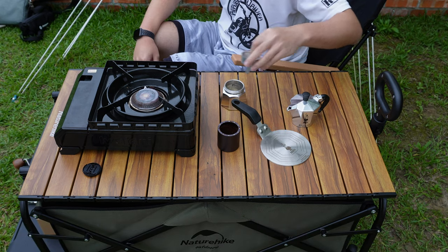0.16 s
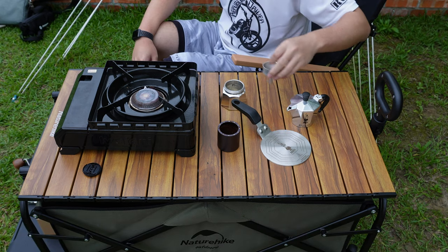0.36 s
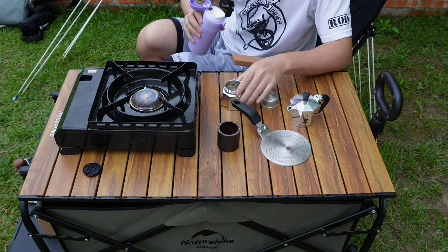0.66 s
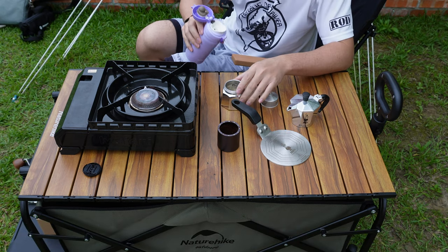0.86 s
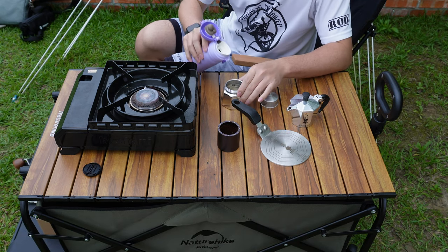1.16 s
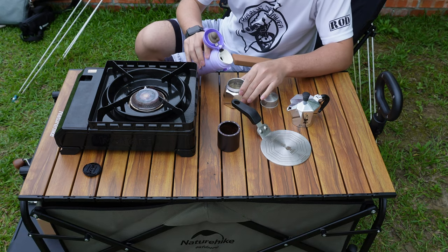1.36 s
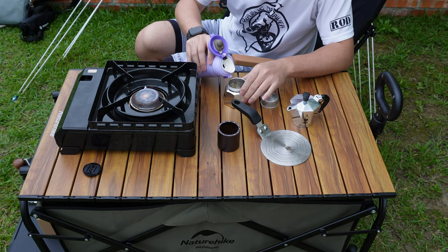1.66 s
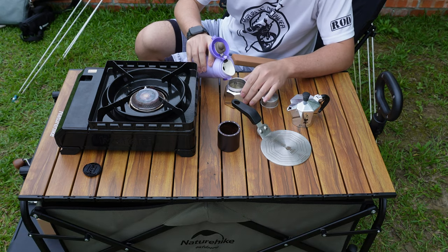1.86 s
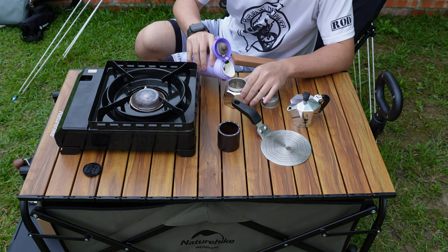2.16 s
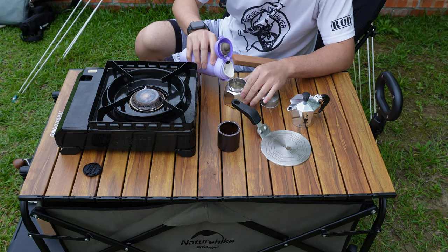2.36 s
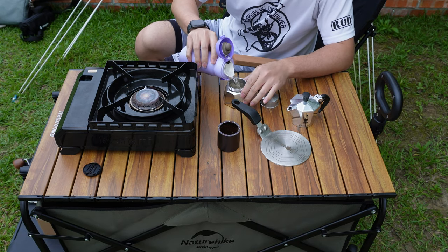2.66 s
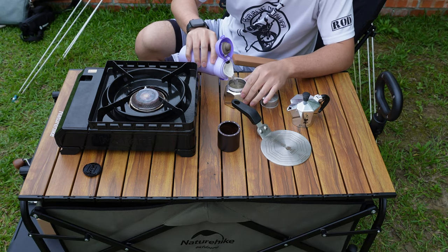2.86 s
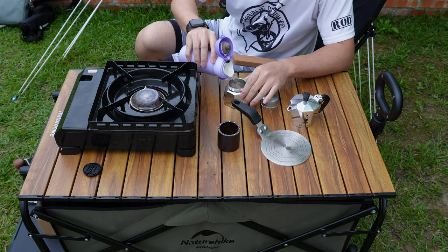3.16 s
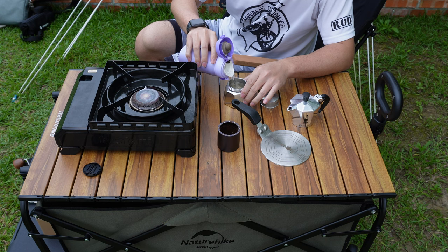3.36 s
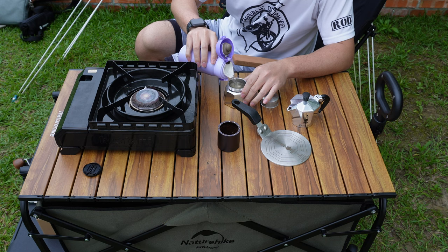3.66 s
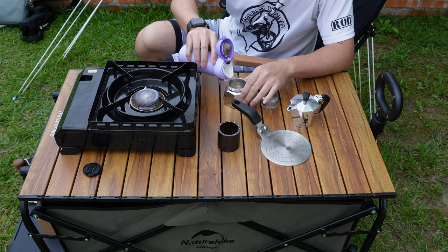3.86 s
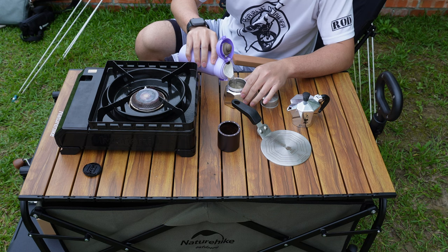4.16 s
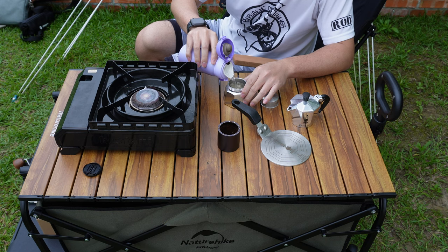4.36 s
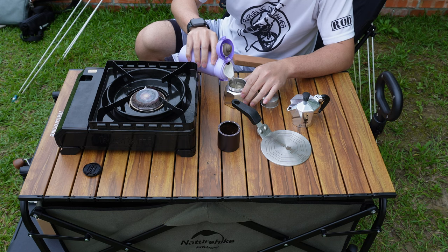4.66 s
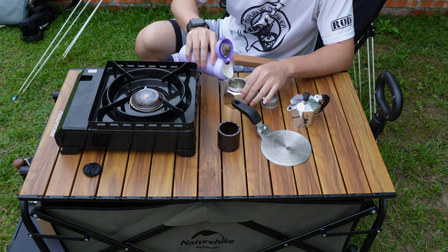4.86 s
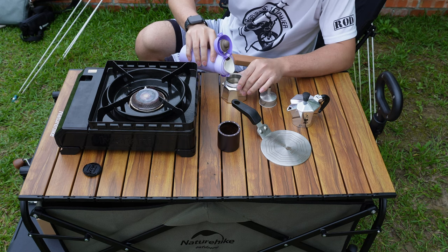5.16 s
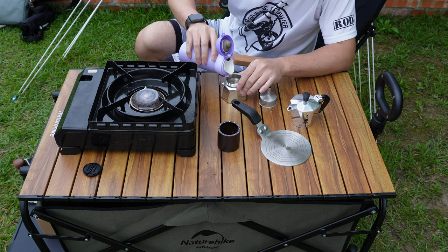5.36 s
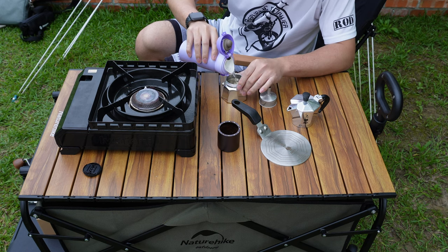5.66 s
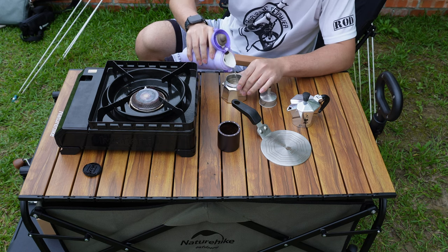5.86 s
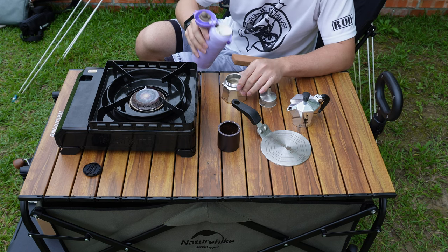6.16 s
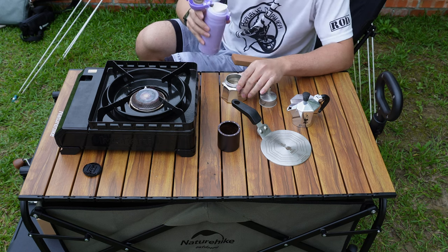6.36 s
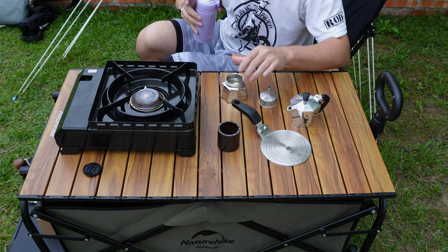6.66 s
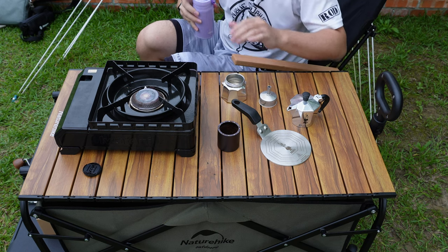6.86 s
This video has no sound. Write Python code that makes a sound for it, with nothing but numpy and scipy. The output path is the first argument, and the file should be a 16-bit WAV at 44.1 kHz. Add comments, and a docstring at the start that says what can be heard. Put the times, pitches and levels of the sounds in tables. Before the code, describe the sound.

Outdoors on a lawn, cicadas pulse and buzz steadily above a faint distant rumble. A small metal funnel chimes, then knocks and scrapes across wooden slats with a brief squeak. Clothing rustles, and a cat meows once to the left. A plastic cup then rattles and taps on the hand-held funnel as coffee grounds rasp and patter in. Small rubs and ticks follow. Close stereo microphones, little echo.

```python
"""Coffee is made at a slatted camping table on a lawn; cicadas and a faint, distant rumble last throughout.
First a metal pot funnel chimes, is knocked and shoved over the slats: dense slips and blows ring its modes.
Clothes rustle as grainy friction noise, and a cat meows once nearby: overtones shaped by three resonances.
Then a plastic grinder cup taps, rattles and squeaks against the held funnel as damped or gliding tones,
while the grounds shaken in rasp through moving resonances and patter; a few rubs, hisses and ticks follow."""
import sys
import numpy as np
from scipy import signal
from scipy.fft import rfft, irfft, next_fast_len
from scipy.io import wavfile
from scipy.ndimage import uniform_filter1d

SR = 44100
rng = np.random.default_rng(int(sys.argv[2]) if len(sys.argv) > 2 else 0)


def waveform_to_disk(signal):
    """Save audio, clipped to [-1, 1], as 16-bit WAV at the path in sys.argv[1]."""
    frames = np.transpose(np.atleast_2d(signal))
    scaled = np.clip(frames, -1, 1) * 32767
    samples = np.round(scaled).astype(np.int16)
    wavfile.write(sys.argv[1], SR, samples)


N = 309134
T = np.arange(N) / SR  # time of every sample, s


def from_db(db):
    """Level definition: an amplitude ratio is 10 to the power of dB / 20."""
    return 10 ** (np.asarray(db) / 20)


def rms_one(x):
    """Power normalisation: the root mean square becomes 1."""
    return x / np.sqrt(np.mean(x ** 2) + 1e-20)


def curve(rows, column):
    """Linear interpolation: one column of a table at every sample."""
    rows = np.array(rows)
    return np.interp(T, rows[:, 0], rows[:, column])


def swell(rows, column):
    """Amplitude envelope: gain of a level column, with short smooth edges and silence outside its span."""
    inside = (T >= rows[0][0]) & (T <= rows[-1][0])
    return from_db(curve(rows, column)) * uniform_filter1d(inside * 1., size=400)


def drift(rate):
    """Band-limited chance: random knots, 2 * rate per second, joined by lines; spread about 1."""
    knots = rng.standard_normal(4000)
    return np.sqrt(3 / 2) * np.interp(T * 2 * rate, np.arange(len(knots)), knots)


def colour(x, points):
    """Spectral shaping: levels joined over log frequency, steep falls beyond the ends; rms 1."""
    size = next_fast_len(N)
    hz, db = np.transpose(points)
    octave = np.log2(np.arange(size // 2 + 1) * SR / size + 1)
    beyond = np.abs(octave - np.clip(octave, np.log2(hz[0]), np.log2(hz[-1])))
    gain = from_db(np.interp(octave, np.log2(hz), db) - 22.4 * beyond)
    return rms_one(irfft(rfft(x, size) * gain, size)[..., :N])


def place(x, pan_db):
    """Interaural level difference: positive is left."""
    return x * from_db([[pan_db / 2], [-pan_db / 2]])


def fine_side(side):
    """Spatial coherence: weaken the low-frequency difference between the channels."""
    return signal.lfilter([1, -.97], [1, -.8], side)


def wide_noise(side_db):
    """Diffuse field: two close microphones share long waves and differ in short ones."""
    mid, side = rng.standard_normal((2, N))
    return mid + from_db(side_db) * fine_side(side) * [[1], [-1]]


def grains(per_s, spread_db):
    """Poisson-like shot noise: random tiny contacts of uneven size."""
    present = rng.random(N) < per_s / SR
    return present * rng.standard_normal(N) * from_db(spread_db * rng.standard_normal(N))


def ring(x, hz, t60):
    """Damped oscillator: a unit click sets a sine of height 1 ringing."""
    r, w = from_db(-60 / (t60 * SR)), 2 * np.pi * hz / SR
    return signal.lfilter([0, np.sin(w)], [1, -2 * r * np.cos(w), r * r], x + 1e-18)


def narrow_noise(hz, width_hz):
    """Quadrature modulation: noise in a resonance whose centre may move; rms 1."""
    low_pass = signal.butter(2, width_hz / 2, fs=SR, output="sos")
    smooth = signal.sosfilt(low_pass, rng.standard_normal((2, N)))
    phase = 2 * np.pi * np.cumsum(hz * np.ones(N)) / SR
    return rms_one(smooth[0] * np.cos(phase) + smooth[1] * np.sin(phase))


def glides(tables, width_hz):
    """Moving resonance: friction noise whose centre glides during each stroke."""
    return sum(swell(rows, 2) * narrow_noise(curve(rows, 1), width_hz) for rows in tables)


def swishes(rows, width_hz):
    """Amplitude modulation: short grainy swells of noise, each in its own resonance."""
    catches = rms_one(from_db(2.8 * drift(80)))
    total = 0
    for s, db, hz, length in rows:
        total = total + from_db(db) * np.exp(-((T - s) / length) ** 2) * narrow_noise(hz, width_hz)
    return catches * total


def strokes(rows):
    """Attack, hold and exponential release: the gain of rubbing strokes."""
    total = 0
    for s, db, attack, hold, t60 in rows:
        rise = np.clip((T - s) / attack, 0, 1) ** 2
        total = total + from_db(db - 60 * np.maximum(T - s - attack - hold, 0) / t60) * rise
    return total


def blip(t, rise_s):
    """Critically damped envelope: it swells to 1 at rise_s and dies."""
    return (t / rise_s) ** 2 * np.exp(2 - 2 * t / rise_s)


def add(out, s, sound):
    """Superposition: mix a short sound in at a time."""
    i = int(np.clip(s * SR, 0, N - 1))
    out[i:i + len(sound)] += sound[:N - i]


def cracks(events, t60, rise_s):
    """Impact envelope: brief bursts that rise fast and die exponentially."""
    gain, t = np.zeros(N), T[:SR // 12]
    for s, db in events:
        add(gain, s - rise_s, from_db(db - 60 * t / t60) * (1 - np.exp(-t / rise_s)))
    return gain


def strike(events, modes, uneven_db):
    """Modal excitation: each blow excites each mode with a strength of its own."""
    out = np.zeros(N)
    chance = rng.standard_normal((len(events), len(modes)))
    for k, (hz, mode_db, t60) in enumerate(modes):
        clicks = np.zeros(N)
        for (s, db), luck in zip(events, chance):
            add(clicks, s, from_db([db + mode_db + uneven_db * luck[k]]))
        out += ring(clicks, hz, t60) * (-1) ** k
    return out


def garden(x, t60):
    """Exponential reverberation: scattered echoes from the table, stove and wall."""
    t = T[:SR // 3]
    present = (rng.random(len(t)) < .5) * (t > .002)
    echoes = wide_noise(side_db=-7.5)[:, :len(t)] * present * from_db(-60 * t / t60)
    echoes = signal.lfilter([1], [1, -.5], echoes)  # duller
    echoes = echoes / np.sqrt(np.sum(echoes ** 2) / 2)
    left, right = signal.fftconvolve(x[None], echoes, axes=1)[:, :N]
    return (left + right + fine_side(left - right) * [[1], [-1]]) / 2


# spectrum of distant traffic and open air: (f/Hz, level/dB)
AIR_SPECTRUM = [(22, -27), (45, -7), (70, -2), (130, 0.5), (210, 3.5), (340, -4.5), (480, -7), (650, -13),
                (1200, -9), (2000, -11), (3200, -13.5), (6000, -21.5), (10000, -29), (15000, -33.5)]


def air():
    """Broadband and narrow-band noise: far rumble, a wavering motor hum and a faint hiss."""
    rumble = from_db(-56.5) * colour(wide_noise(side_db=-1.0), AIR_SPECTRUM)
    hiss = from_db(-75.0) * colour(wide_noise(side_db=-8), [(2000, 0), (15000, -1)])
    hum = from_db(-66) * narrow_noise(243, width_hz=6.2)
    return rumble + hiss + hum


def tymbal(phrases, per_s, uneven, top_hz, end_hz, length_s, spread_db):
    """Buckling: each click of a cicada's drum is a short falling chirp; each phrase swells at its start."""
    out, t = np.zeros(N), T[:int(length_s * SR)]
    for start, end in phrases:
        s = start
        while s < end:
            gap, size, pitch = rng.standard_normal(3)
            hz = (top_hz + (end_hz - top_hz) * t / length_s) * (1 + .015 * pitch)
            swelling = min(1, .5 + (s - start) / .08)
            chirp = np.sin(np.pi * t / length_s) * np.sin(2 * np.pi * np.cumsum(hz) / SR)
            add(out, s, swelling * from_db(spread_db * size) * chirp)
            s += max(1 + uneven * gap, .5) / per_s
    return out


def phrasing(bouts, phrase_s):
    """Periodic gating: break each bout into evenly spaced phrases, (start s, end s)."""
    return [(s, s + phrase_s) for start, end, every in bouts for s in np.arange(start, end, every)]


# bouts of the nearest cicada: (start t/s, end t/s, time between phrase starts t/s)
NEAR_BOUTS = [(0.05, 2.6, .2192), (3.51, 3.9, .25), (4.008, 5.0, .2155), (5.225, 5.8, .221),
              (6.78, 6.9, .22)]
# spectra of the far cicadas of a low and a high kind: (f/Hz, level/dB)
LOW_SPECTRUM = [(3200, -38), (3700, -16), (4000, -3.5), (4300, 3.5), (4650, 9.5), (5000, 4.5), (5250, -1),
                (5550, -19.5), (6000, -58), (8500, -62), (9400, -21), (10800, -49)]
HIGH_SPECTRUM = [(5700, -53), (6100, -11.5), (6450, 0.5), (6750, 0), (7200, 5), (7600, -1), (8000, -5),
                 (8400, -76)]


def cicadas():
    """Incoherent sum: a near phrased singer, a steady one, a high buzzer and a blurred chorus of both kinds."""
    always = [(0.0016, N / SR)]
    near = from_db(-40.0) * tymbal(phrasing(NEAR_BOUTS, phrase_s=.112), per_s=56.5, uneven=.05,
                                   top_hz=4800, end_hz=3780, length_s=0.0105, spread_db=2)
    steady = rms_one(tymbal(always, per_s=56, uneven=.1, top_hz=5264, end_hz=4450,
                            length_s=0.01007, spread_db=4.0))
    buzz = rms_one(tymbal(always, per_s=79.5, uneven=0.011, top_hz=7658, end_hz=6860,
                          length_s=0.00727, spread_db=2.5))
    far_low = colour(wide_noise(side_db=-6.0), LOW_SPECTRUM)
    far_buzz = colour(wide_noise(side_db=-7), HIGH_SPECTRUM)
    low = place(from_db(-7.5) * steady, pan_db=-7.0) + place(from_db(1.0) * far_low, pan_db=-2.0)
    high = place(from_db(-4) * buzz + from_db(-2) * far_buzz, pan_db=-6.5)
    # both levels waver by about half a decibel
    chorus = from_db(-47.5 + .5 * drift(2.22)) * low + from_db(-57.5 + .5 * drift(1.5)) * high
    return place(near + from_db(-4.5) * garden(near, t60=0.066), pan_db=-3.5) + chorus


def resonance(hz, centre_hz, width_hz):
    """Resonance curve: a bell-shaped gain that is half at half the width from its centre."""
    return 1 / (1 + (2 * (hz - centre_hz) / width_hz) ** 2)


# meow: (t/s, pitch f/Hz, mouth resonance f/Hz, mouth level/dB, throat level/dB)
MEOW_COURSE = [(2.07, 440, 1900, -61, -54), (2.19, 458.6, 2050, -40.5, -45.5),
               (2.245, 464.7, 2090, -37, -42.5), (2.33, 467, 2010, -36.5, -45.5),
               (2.425, 454.7, 1905, -39, -44), (2.51, 449.6, 1810, -38.5, -45),
               (2.6, 428.6, 1690, -48, -54.5), (2.658, 394, 1580, -55, -64), (2.71, 360, 1518, -64, -76)]
MOUTH_WIDTH_HZ, THROAT_HZ, THROAT_WIDTH_HZ = 627, 3760, 760
# the highest resonance comes and goes with the gape of the mouth
GAPE_S, GAPE_WIDTH_S, GAPE_DB, GAPE_HZ, GAPE_WIDTH_HZ = 2.3, 0.14, -50, 5430, 780


def cat(jitter, flutter_db, closing_s, hum_db, rasp_db):
    """Source and filter: overtones pass three resonances, the lowest following the mouth; a hum ends it."""
    pitch, mouth_hz = curve(MEOW_COURSE, 1), curve(MEOW_COURSE, 2)
    phase = 2 * np.pi * np.cumsum(pitch * (1 + jitter * drift(150))) / SR
    low, high = swell(MEOW_COURSE, 3), swell(MEOW_COURSE, 4)
    gape = from_db(GAPE_DB) * np.exp(-((T - GAPE_S) / GAPE_WIDTH_S) ** 2)
    # the fundamental is heard only as a nasal hum around the closing of the mouth
    voice = from_db(hum_db) * np.exp(-((T - closing_s) / 0.095) ** 2) * np.sin(phase)
    for k in range(2, 15):
        hz = k * pitch
        gain = low * resonance(hz, mouth_hz, MOUTH_WIDTH_HZ)
        gain = gain - high * resonance(hz, THROAT_HZ, THROAT_WIDTH_HZ)
        gain = gain - gape * resonance(hz, GAPE_HZ, GAPE_WIDTH_HZ)
        shake_rad = 0.05 * k * drift(130)  # cycles waver more in each higher overtone
        voice += gain * from_db(flutter_db * drift(18)) * np.sin(k * phase + shake_rad)
    breath = low * narrow_noise(mouth_hz, MOUTH_WIDTH_HZ) + high * narrow_noise(THROAT_HZ, width_hz=1500)
    return np.sqrt(2) * voice + from_db(rasp_db) * breath * (1 + np.cos(phase))


# strokes of clothes and hands rubbing: (start t/s, level/dB, attack t/s, hold t/s, release t60 t/s)
RUB_STROKES = [(0, -52, 0.00053, 0.089, 0.41), (1.08, -53, 0.042, 0.14, 1.05),
               (1.335, -53.5, 0.016, 0.029, 0.097), (1.629, -57, 0.0066, 0.038, 0.06),
               (2.65, -51.5, 0.04, 0.029, 0.58), (5.364, -56.5, 0.0049, 0.053, 2.1),
               (6.574, -51, 0.0062, 0.0045, 0.073)]
# spectrum of the rubbing: (f/Hz, level/dB)
RUB_SPECTRUM = [(250, -9), (520, -4.5), (680, -9), (1100, -2.5), (1600, -2), (2200, -10), (3600, -15)]
# forearm dragging on the slats: (start t/s, level/dB, attack t/s, hold t/s, release t60 t/s)
FOREARM_DRAGS = [(4.005, -54.5, 0.0078, 0.14, 0.17), (5.385, -53.5, 0.0089, 0.013, 0.57)]
# a sleeve sweeping past the table, one table per sweep: (t/s, resonance f/Hz, level/dB)
SLEEVE_SWEEPS = [
    [(1.10, 2004, -62), (1.18, 1430, -45.5), (1.22, 1350, -55), (1.25, 1082, -49.5), (1.45, 943, -62.5)],
    [(1.635, 1612, -51), (1.685, 1715, -49.5), (1.79, 1527, -59), (1.9, 1450, -58)],
]


def hands():
    """Dry friction: clothes and hands rub in fine grains; the slats answer a forearm with a low note."""
    rub = strokes(RUB_STROKES) * colour(grains(per_s=3500, spread_db=2.5), RUB_SPECTRUM)
    drag = strokes(FOREARM_DRAGS) * narrow_noise(hz=480.5, width_hz=110)
    sweep = glides(SLEEVE_SWEEPS, width_hz=590) * rms_one(from_db(2 * drift(70)))
    return rub + drag + sweep


# short grainy hisses of grounds or fingers at the cup: (t/s, level/dB, centre f/Hz, length t/s)
SHORT_HISSES = [(4.475, -51, 3060, 0.037), (6.435, -56.5, 3060, 0.029), (6.69, -52.5, 3060, 0.041)]


def hisses():
    """Band-limited noise: short grainy hisses of grounds or fingers at the cup."""
    return swishes(SHORT_HISSES, width_hz=930)


# hands and wrists bumping the table: (t/s, level/dB, pitch of the thud f/Hz)
TABLE_BUMPS = [(0.519, -42.5, 230), (0.766, -41.5, 237), (1.233, -40.5, 199), (5.368, -39.5, 267)]
# modes of the table: (f/Hz, level/dB, t60 t/s)
TABLE_MODES = [(164, 0, 0.045), (265, 1, 0.025), (418, 1, 0.058), (648, -9.5, 0.13), (1030, 2, 0.018),
               (1620, 6, 0.017)]


def bumps(rise_s, thud_db, ring_db):
    """Soft impact: a thud, pitched by the spot that is hit, sets the table ringing."""
    out, t = np.zeros(N), T[:SR // 8]
    for s, db, hz in TABLE_BUMPS:
        add(out, s, from_db(db + thud_db) * blip(t, rise_s) * np.sin(2 * np.pi * hz * t))
    blows = [(s, db) for s, db, _ in TABLE_BUMPS]
    return out + from_db(ring_db) * strike(blows, TABLE_MODES, uneven_db=3.5)


# crumbs and fingernails ticking on metal: (t/s, relative level/dB)
TICK_EVENTS = [(2.9405, -55), (3.083, -52), (3.236, -53), (3.7803, -47), (5.6592, -53), (6.8154, -51.5)]
# spectrum of the ticks: (f/Hz, level/dB)
TICK_SPECTRUM = [(1500, -4), (4000, 9.5), (7000, 2), (9000, -0.5), (12000, -1), (16000, -21)]


def ticks(t60):
    """Hard impact: short contacts make tiny bright cracks."""
    return cracks(TICK_EVENTS, t60, rise_s=0.00041) * colour(rng.standard_normal(N), TICK_SPECTRUM)


# rim clinks: (t/s, level/dB, pitch f/Hz, second mode f/Hz)
RIM_CLINKS = [(0.01, -35.5, 3800, 4660), (3.237, -39.5, 5720, 7400), (3.266, -46, 3450, 4450),
              (5.18, -40.5, 2560, 3770), (5.886, -40, 2890, 3900), (5.925, -35.5, 3870, 3900),
              (5.941, -42, 3930, 2800), (5.987, -39, 4000, 3200), (6.058, -40, 2540, 3880)]


def clinks(second_db, rise_s, edge_db):
    """Hand damping: thin rims touch and sound two quickly damped modes with a gritty edge."""
    out, t = np.zeros(N), T[:SR // 4]
    grit = colour(rng.standard_normal(N), [(1500, -19), (2600, 1), (4200, 2), (9000, -12)])
    for s, db, hz, second_hz in RIM_CLINKS:
        tone = np.sin(2 * np.pi * hz * t) + from_db(second_db) * np.sin(2 * np.pi * second_hz * t)
        edge = from_db(edge_db) * np.roll(grit, int(s * SR))[:len(t)]
        add(out, s, from_db(db) * blip(t, rise_s) * (tone + edge))
    return out


# the funnel's free rim chimes as it is lifted: (t/s, level/dB)
RIM_CHIMES = [(0.008, -42.5)]
# modes of the free rim: (f/Hz, level/dB, t60 t/s)
RIM_MODES = [(4150, -4, 0.33), (4010, 2, 0.28), (10000, -15, 0.29)]


def chimes():
    """Free vibration: the undamped rim rings on in its modes."""
    return strike(RIM_CHIMES, RIM_MODES, uneven_db=4)


# the cup trembles against the rim while it is shaken: (t/s, pitch f/Hz, level/dB)
CUP_RATTLE = [(3.97, 1200, -56), (4.12, 1260, -45), (4.33, 1090, -54), (4.44, 1050, -52), (4.65, 1080, -50),
              (5.05, 1000, -61)]


def rattle(per_s, rise_s):
    """Repeated excitation: light uneven touches ring the damped funnel, whose note sinks as it fills."""
    phase = 2 * np.pi * np.cumsum(curve(CUP_RATTLE, 1)) / SR
    # the touches are shifted down to zero frequency, shaped, and shifted back up to the note
    touches = grains(per_s, spread_db=-2.0) * np.exp(-1j * phase)
    rings = signal.fftconvolve(touches, blip(T[:SR // 20], rise_s))[:N]
    return swell(CUP_RATTLE, 2) * rms_one(np.imag(rings * np.exp(1j * phase)))


# the funnel slips on the slats or under the cup's rim, one table per squeak: (t/s, pitch f/Hz, level/dB)
SLIP_SQUEAKS = [
    [(0.646, 1230, -40), (0.654, 1167, -32.5), (0.667, 1143, -28.5), (0.681, 1146, -39)],
    [(3.195, 1180, -71), (3.25, 1018, -47), (3.262, 1068, -50)],
    [(5.895, 1252, -50), (5.92, 1285, -50), (5.935, 1250, -53)],
    [(5.955, 1110, -42), (5.975, 1078, -50), (5.997, 1027, -42), (6.028, 990, -55.5)],
]


def squeaks(jitter, flutter_db):
    """Stick-slip: a thin, unsteady tone that glides as the surfaces slip."""
    total = 0
    for rows in SLIP_SQUEAKS:
        gain = swell(rows, 2) * from_db(flutter_db * drift(90))
        hz = curve(rows, 1) * (1 + jitter * drift(200))
        total = total + gain * np.sin(2 * np.pi * np.cumsum(hz) / SR)
    return total


# gushes of grounds leaving the cup, one table per gush: (t/s, resonance f/Hz, relative level/dB)
POUR_GUSHES = [
    [(4.03, 1740, -49), (4.095, 1556, -40.5), (4.16, 1514, -40.5), (4.195, 2194, -46), (4.25, 2253, -51.5),
     (4.29, 2203, -46.5), (4.36, 2290, -55)],
    [(4.915, 1656, -56), (4.985, 2264, -47), (5.02, 1990, -53)],
    [(5.13, 1940, -55), (5.17, 1824, -48), (5.198, 2600, -51)],
]
# grounds landing in the funnel: (start t/s, level/dB, attack t/s, hold t/s, release t60 t/s)
GROUNDS_LANDINGS = [(4.05, -43, 0.027, 0.067, 0.26), (4.21, -48, 0.024, 0.053, 0.59)]


def grounds():
    """Granular flow: clumps of powder rasp through the cup's mouth, which sings faintly, and patter down."""
    clumps = rms_one(from_db(2.5 * drift(90)))
    patter = colour(grains(per_s=800, spread_db=-2.0), [(800, -24), (1200, 6), (1700, 6), (2600, -21)])
    rasp = from_db(-2) * glides(POUR_GUSHES, width_hz=680)
    singing = from_db(-5.0) * glides(POUR_GUSHES, width_hz=160)
    return (rasp + singing) * clumps + strokes(GROUNDS_LANDINGS) * patter


# cup tapping the hand-damped funnel: (t/s, relative level/dB, pitch f/Hz)
CUP_TAPS = [(3.266, -39, 1208), (3.832, -31, 1253), (3.863, -38, 1150), (3.882, -36, 1320),
            (3.896, -40, 1320), (3.956, -36, 1117), (3.987, -30, 1244), (4.006, -35, 1210),
            (4.028, -27.5, 1280), (4.052, -25.5, 1270), (4.101, -33, 1293), (4.203, -35, 1260),
            (4.27, -32.5, 1270), (4.342, -25.5, 1044), (4.574, -39, 1100), (4.606, -33.5, 1120),
            (4.626, -32, 1050), (4.701, -40, 1130), (4.768, -32, 1090), (4.882, -35.5, 1075),
            (4.996, -38, 970), (5.654, -42.5, 1660), (5.831, -33.5, 1338), (5.939, -29.5, 1260),
            (5.949, -33.5, 1094), (5.987, -45, 1070)]


def taps(rise_s, lead_s, tail_db, tail_t60):
    """Damped modes: soft contacts swell and die in two modes, with a faint scuff and a decaying tail."""
    out, t = np.zeros(N), T[:SR // 6]
    scuffs = colour(rng.standard_normal(N), [(700, -4), (1600, 3), (4000, -9), (12000, -26)])
    upper = from_db(-6) * np.sin(2 * np.pi * 1412 * t)
    for s, db, hz in CUP_TAPS:
        phase = 2 * np.pi * hz * t
        scuff = from_db(-24) * np.roll(scuffs, int(s * SR))[:len(t)]
        contact = blip(t, rise_s) * (np.sin(phase) + upper + scuff)
        detuned = np.sin(phase * (1 + 0.019 * rng.standard_normal()))
        tail = from_db(tail_db - 60 * t / tail_t60) * (1 - np.exp(-t / rise_s)) * detuned
        add(out, s - lead_s, from_db(db) * (contact + tail))
    return out


# knocks on the funnel, and a bump of the table (the last row): (t/s, relative level/dB)
KNOCKS_AND_BUMP = [(0.008, -32.5), (0.6, -35), (0.609, -25), (0.686, -18.5), (1.237, -35.5)]
# modes of the funnel on the table: (f/Hz, level/dB, nominal t60 t/s)
FUNNEL_MODES = [(560, -2, 0.03), (774, -12, 0.43), (890, 1, 0.032), (1060, -1, 0.081), (1658, 8, 0.031),
                (2000, 2, 0.037), (2350, -2, 0.039), (2430, 0.5, 0.015), (3120, -23, 0.092),
                (4020, -5, 0.073), (5250, -14, 0.03)]
# shoves of the funnel over the slats: (start t/s, relative level/dB, attack t/s, hold t/s, release t60 t/s)
FUNNEL_SHOVES = [(0.56, -46, 0.0099, 0.029, .05), (0.584, -28, 0.018, 0.018, 0.18),
                 (0.646, -41.5, 0.0072, 0.03, 0.04), (0.688, -38, 0.0042, 0.018, 0.11)]


def funnel():
    """Friction-driven modes: dense slips ring the sliding funnel; grit sounds when it is pressed hardest."""
    slips = grains(per_s=15000, spread_db=-1.5)
    body = 0
    for k, (hz, db, t60) in enumerate(FUNNEL_MODES):
        body = body + ring(slips, hz, t60 * 0.98) * from_db(db) * (-1) ** k
    body = rms_one(body)
    slats = colour(slips, [(250, -39), (600, -9.5), (1100, 8.0), (1700, -9.5), (2800, -11.5), (5000, -13.5)])
    grit = colour(slips, [(2000, 28.0), (5000, -49), (7500, 9.5), (13000, -63)])
    push = strokes(FUNNEL_SHOVES)
    pressed_grit = from_db(-6.5) * push / push.max() * grit
    slide = push * (from_db(-7.0) * body + from_db(-1.5) * slats + pressed_grit)
    # each knock or bump cracks on the slats and leaves the metal ringing
    crack = cracks(KNOCKS_AND_BUMP, t60=0.025, rise_s=0.00072) * slats
    ringing = strike(KNOCKS_AND_BUMP, FUNNEL_MODES, uneven_db=-4.0)
    return slide + from_db(-2.0) * crack + from_db(-12.5) * ringing


def scene():
    """Superposition: everything on the table is near the middle; the cat is to the left."""
    meow = cat(jitter=0.0029, flutter_db=1.0, closing_s=2.624, hum_db=-57.5, rasp_db=-27)
    table = hands() + hisses() + bumps(rise_s=0.0066, thud_db=0.0, ring_db=-7.5)
    table = table + from_db(5.5) * ticks(t60=0.047)
    table = table + clinks(second_db=-5.5, rise_s=0.0027, edge_db=-7.5) + chimes()
    table = table + rattle(per_s=130, rise_s=0.0029) + squeaks(jitter=0.0217, flutter_db=4.5) + grounds()
    table = table + from_db(-1.5) * taps(rise_s=0.0033, lead_s=0.00024, tail_db=-7, tail_t60=0.043)
    table = table + funnel()
    animal = place(meow + from_db(-12.5) * garden(meow, t60=0.088), pan_db=4.0)
    near = place(table, pan_db=-1.2) + from_db(-11.0) * garden(table, t60=0.24)
    return air() + cicadas() + animal + near


def record(dry):
    """Low-pass filtering: the top is cut steeply above 15.6 kHz."""
    return signal.sosfilt(signal.ellip(10, .3, 80, 15600, fs=SR, output="sos"), dry)


dry = scene()
out = record(dry)
waveform_to_disk(out)
```